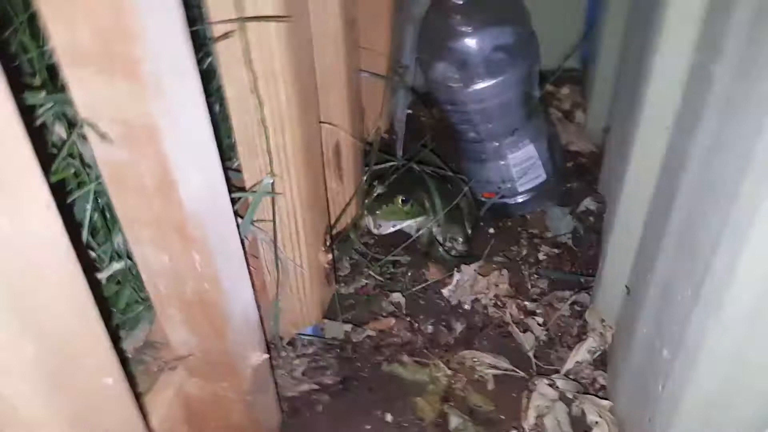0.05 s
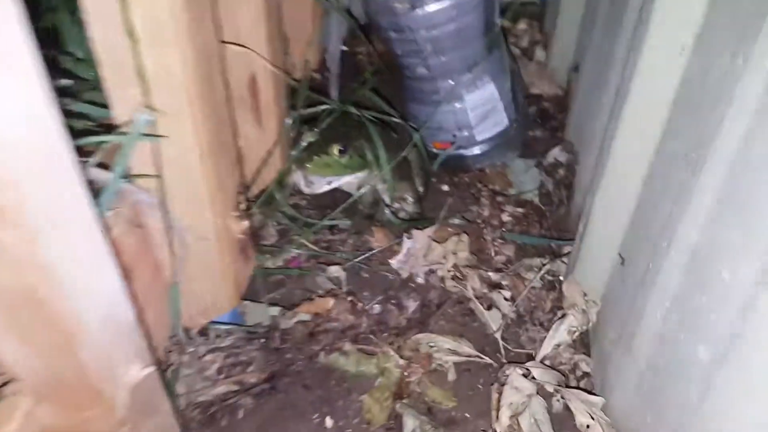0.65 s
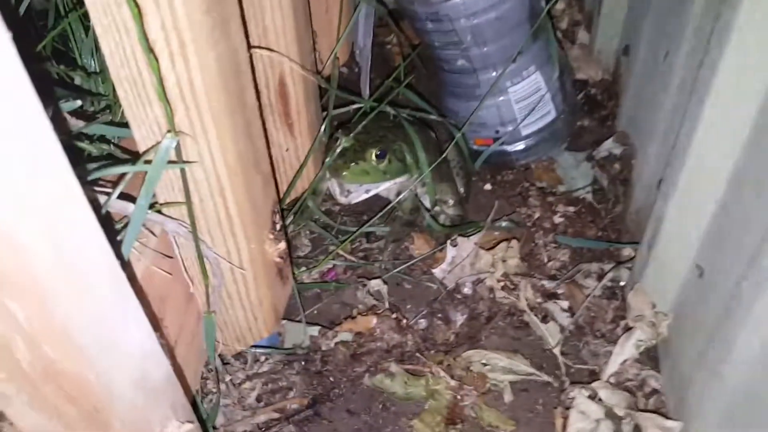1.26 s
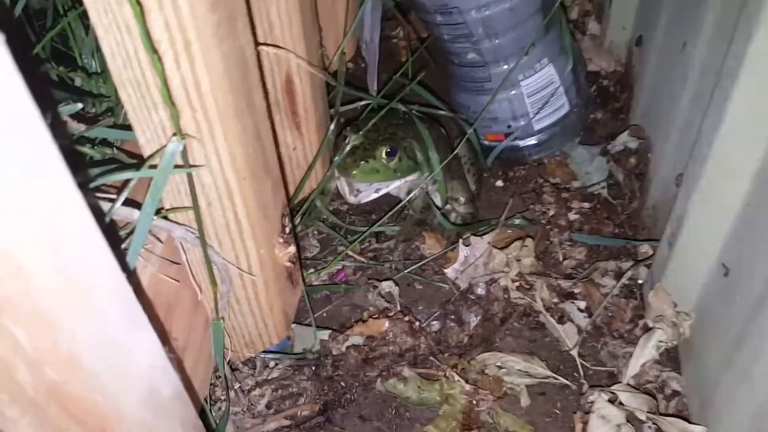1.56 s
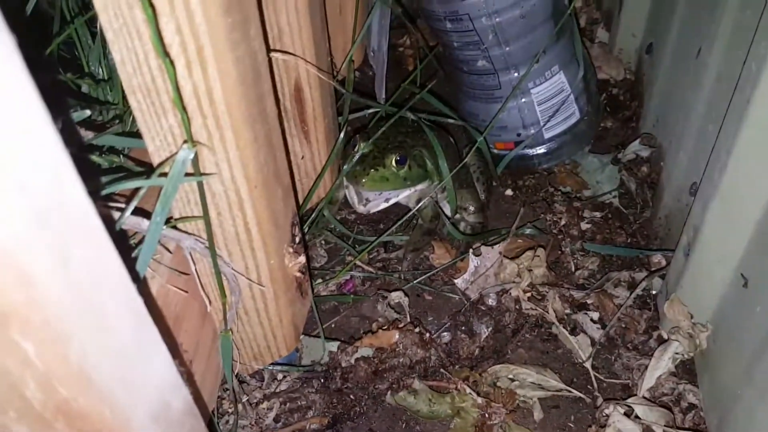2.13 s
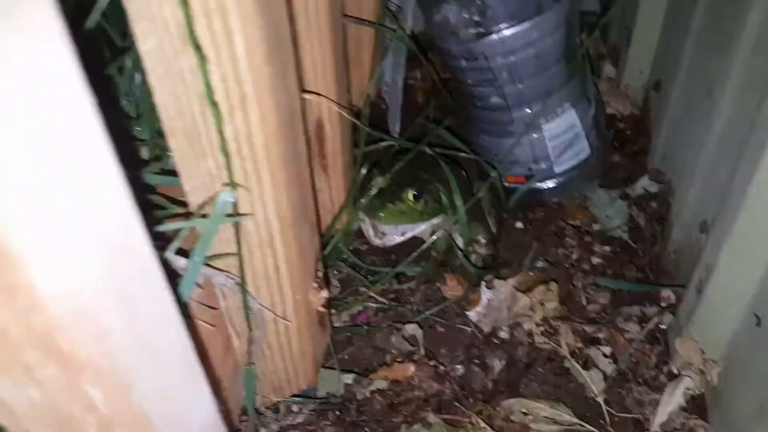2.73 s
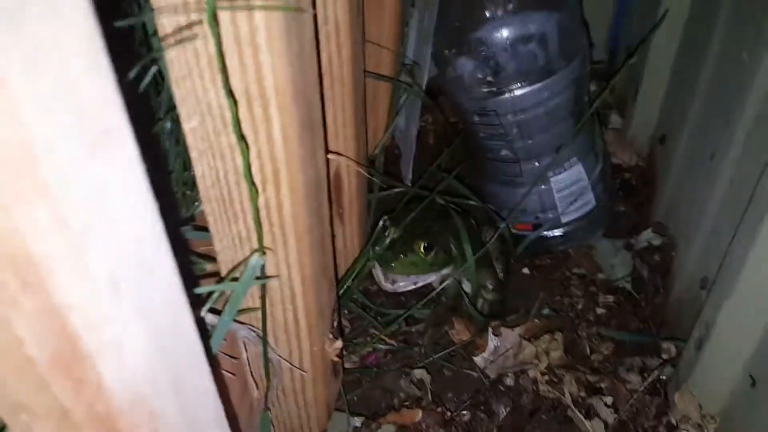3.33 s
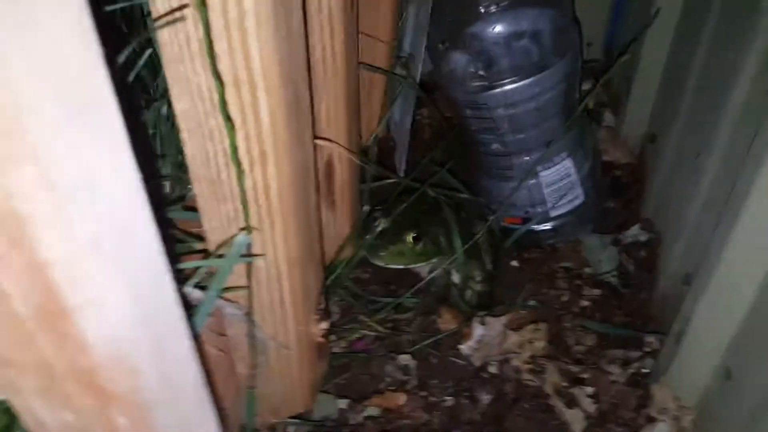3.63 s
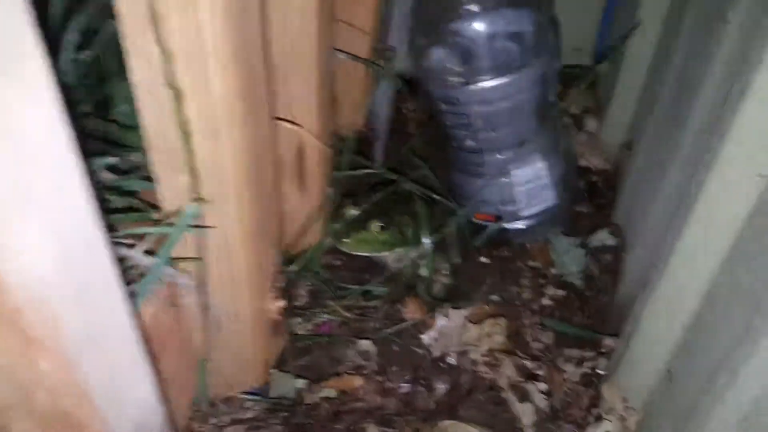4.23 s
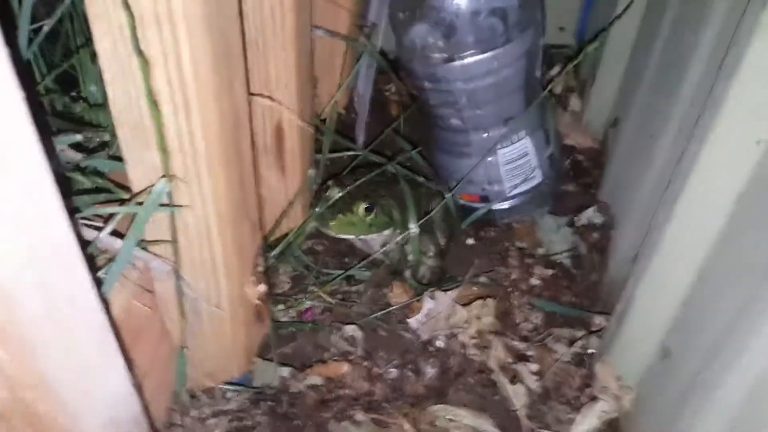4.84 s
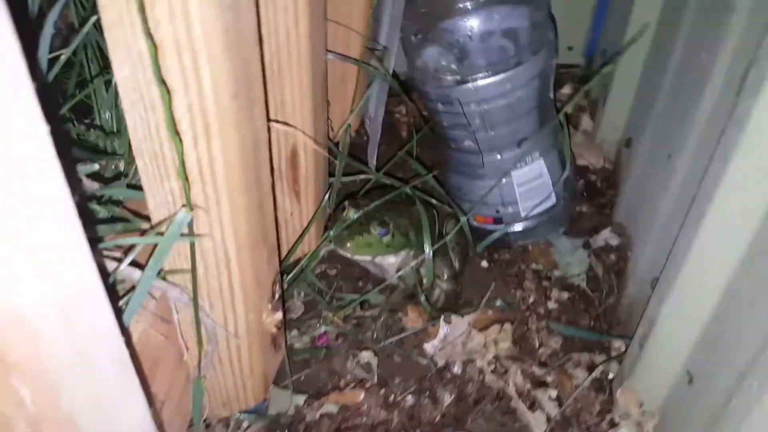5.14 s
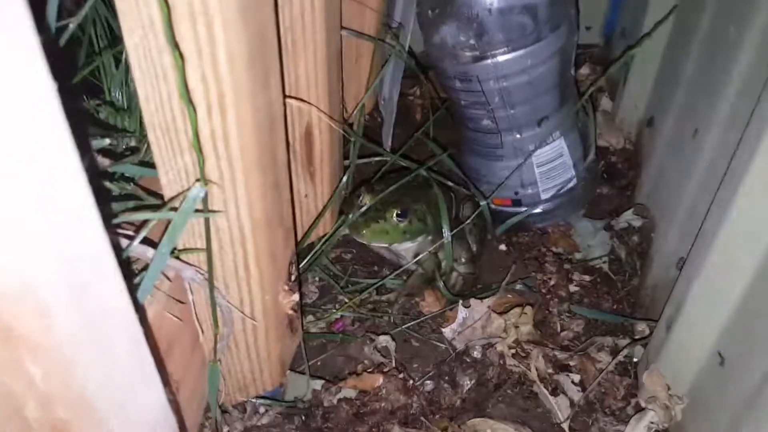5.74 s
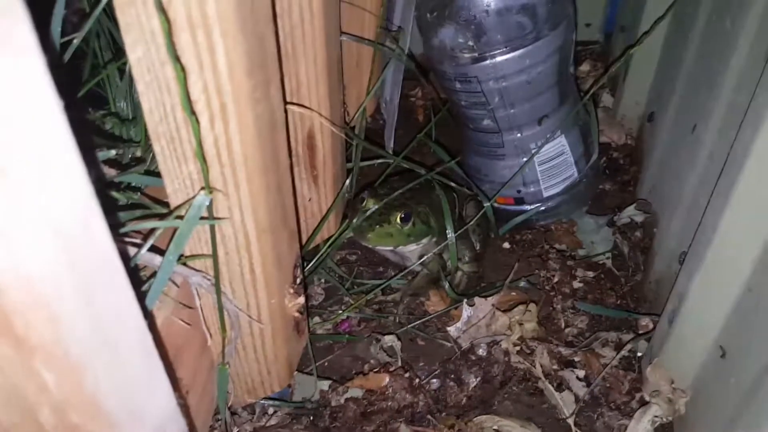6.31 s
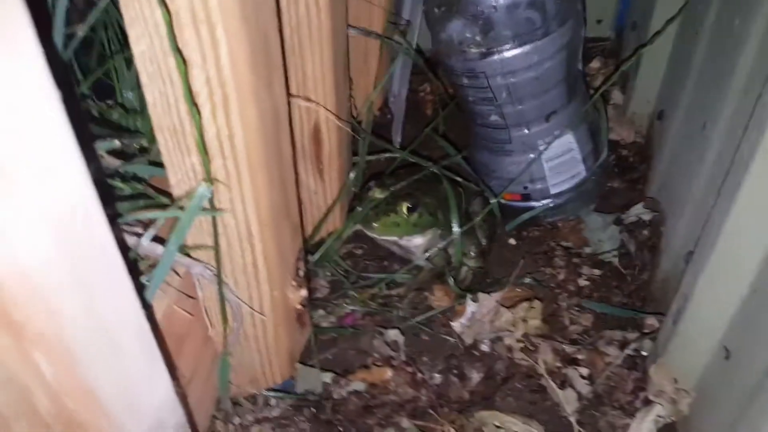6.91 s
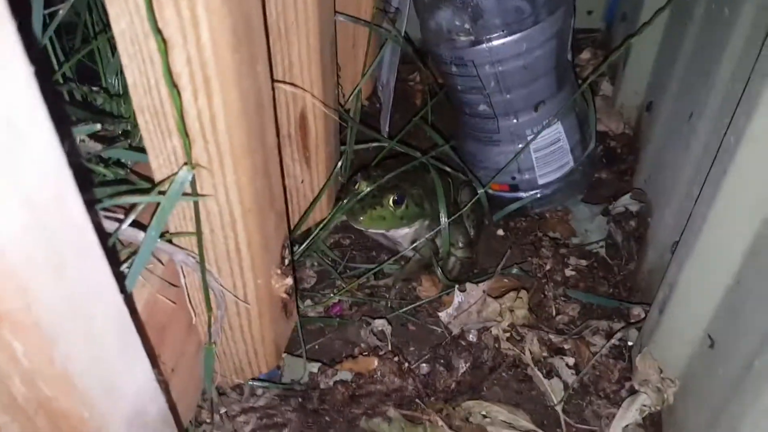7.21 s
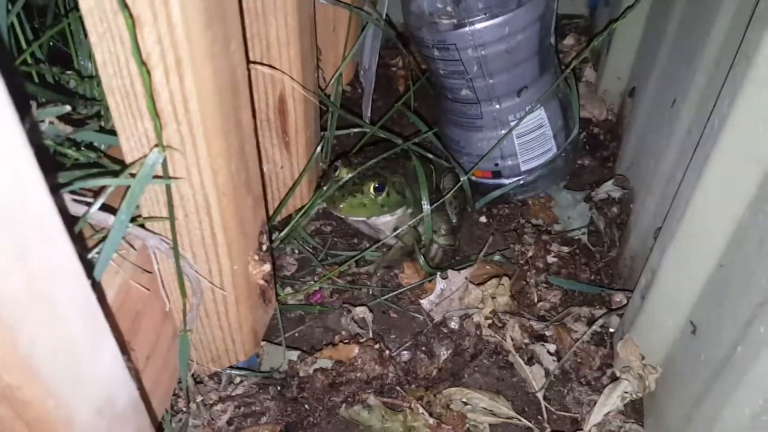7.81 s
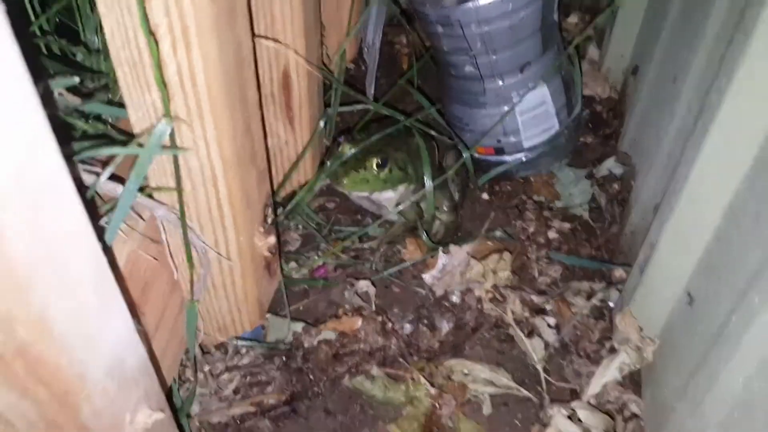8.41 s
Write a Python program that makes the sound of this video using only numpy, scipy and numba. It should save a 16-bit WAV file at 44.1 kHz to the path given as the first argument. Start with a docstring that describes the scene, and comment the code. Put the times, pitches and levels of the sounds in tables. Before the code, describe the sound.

Close by in a narrow gap in a yard, a frog lets out one long, shrill scream. It drops in pitch by steps, breaks between a clean tone and a rasp, and ends in a brief rising squeak. Afterwards dry leaves rustle faintly and twigs give tiny snaps. A machine hums low and steady throughout over soft outdoor hiss, and fingers now and then bump the hand-held microphone.

```python
"""One long frog scream sinks in pitch by steps, breaks between clean and rasping, and ends in a squeak.
The frog is cornered between a wooden fence and a metal wall. Membranes in its throat chop its
breath into pulses, which ring in its body and open mouth and echo in the narrow gap.
A machine hums in the yard and fingers bump the hand-held microphone.
The hand rubs softly on the microphone during the cry; then dry leaves rustle in swells."""
import sys
import numpy as np
from scipy import signal
from scipy.fft import rfft, irfft
from scipy.io import wavfile
from scipy.ndimage import uniform_filter1d
from numba import njit

SR = 44100
rng = np.random.default_rng(int(sys.argv[2]) if len(sys.argv) > 2 else 0)


def dump_mix(stems):
    """Bounce the given channels to the path in sys.argv[1] as a 16-bit WAV at rate SR."""
    frames = np.atleast_2d(stems).T  # one column per channel
    limited = np.clip(frames, -1, 1)  # hard clip at full scale
    pcm = np.round(limited * 32767).astype(np.int16)
    wavfile.write(sys.argv[1], SR, pcm)


N = 377496
TIME = np.arange(N) / SR
BINS = np.maximum(np.fft.rfftfreq(N, 1 / SR), 1)   # the frequencies of a spectrum, in Hz
CRY_END_S, CRY_SAMPLES = 3.6, 4 * SR
BREAK_S = 0.0014   # time the voice takes to break

# fits of rasping that break into the clean voice:
# (start [s], end [s], roughness [0-1], pitch swing [share], second membrane's buzz [0-1], rattle [0-1])
RASP_FITS = [(0.678, 1.011, 0.56, 0.0064, 0.3, 0.16), (1.07, 1.345, 0.25, .0005, 0.77, 0.05),
             (1.352, 1.384, 0.83, 0.0096, 0.7, 0.16), (1.439, 1.51, 0.2, 0.0028, 0.5, 0.09),
             (1.531, 1.687, 0.68, 0.012, 0.87, 0.1), (1.69, 1.83, 0.56, 0.0041, 0.74, 0),
             (1.833, 1.904, 0.27, 0.0125, 0.9, 0.24), (1.9, 2.157, 0.29, 0.0037, 0.6, 0.12),
             (2.271, 2.38, 0.41, 0.0033, 0.75, 0.17), (2.65, 2.854, 0.68, 0.00496, 0.4, 0.14),
             (2.857, 3.045, 0.8, .06, 0.53, 0.24), (3.045, 3.084, 0.4, 0.016, 0, 0),
             (3.177, 3.372, 0.3, .06, 0.8, 0.2), (3.474, 3.582, 0.6, 0.0218, 0.7, 0.4)]


def from_db(db):
    """Turn decibels into a factor to multiply by."""
    return 10 ** (np.asarray(db) / 20)


def rms_one(x):
    """Scale a signal to an average power of 1."""
    return x / np.sqrt(np.mean(x ** 2) + 1e-20)


def in_time(rows):
    """Join a table's rows with straight lines over time: one curve per value column."""
    times, *columns = np.transpose(rows)
    return [np.interp(TIME, times, column) for column in columns]


def at_bins(points, bins=BINS):
    """Read a table at every frequency, giving each octave equal room."""
    hz, value = np.transpose(points)
    return np.interp(np.log(bins), np.log(hz), value)


def during(start, end, fade_s):
    """1 between two times and 0 outside, with short fades."""
    return np.clip(np.minimum(TIME - start, end - TIME) / fade_s + .5, 0, 1)


def drift(rate_hz):
    """A smooth random wobble of typical size 1, mostly slower than the given rate."""
    return rms_one(irfft(rfft(rng.standard_normal(N)) / (1 + (BINS / rate_hz) ** 2), N))


def resonate(x, hz, width_hz):
    """A resonance: sound near one frequency passes, the rest is weakened."""
    r = np.exp(-np.pi * width_hz / SR)
    feedback = [1, -2 * r * np.cos(2 * np.pi * hz / SR), r * r]
    return signal.lfilter(np.array([1, 0, -1]) * (1 - r * r) / 2, feedback, x + 1e-18)


@njit
def gliding(x, hz, width_hz):
    """A resonance whose frequency follows a curve."""
    angle, r = 2 * np.pi * hz / SR, np.exp(-np.pi * width_hz / SR)
    y = np.zeros(len(x))
    for i in range(2, len(x)):
        push = (1 - r * r) / 2 * (x[i] - x[i - 2])
        y[i] = push + 2 * r * np.cos(angle[i]) * y[i - 1] - r * r * y[i - 2]
    return y


def ringing(source, resonances):
    """Ring several resonances at once and add them with alternating signs."""
    return sum((-1) ** k * from_db(db) * resonate(source, hz, width)
               for k, (hz, width, db) in enumerate(resonances))


def air_noise(spectrum):
    """Stereo noise with a given spectrum, nearly the same left and right in the bass."""
    # how alike the two sides are: (frequency [Hz], likeness [-1 to 1])
    likeness = [(60, 0.94), (150, 0.99), (380, 0.76), (950, 0.23), (2380, -0.13), (5980, 0.053),
                (15000, -0.12)]
    mid, side = rfft(rng.standard_normal((2, N)))
    alike = np.clip(at_bins(likeness), -.99, .99)
    pair = np.sqrt(1 + alike) * mid + np.sqrt(1 - alike) * side * [[1], [-1]]
    return rms_one(irfft(pair * from_db(at_bins(spectrum)), N))


def yard(hiss_db=-41.5, rumble_db=-46.5):
    """Steady outdoor hiss over a low rumble."""
    # the tone of each: (frequency [Hz], relative level [dB])
    hiss = [(100, -47), (170, -4.5), (290, -11), (380, -5.5), (600, -11), (780, -7.5), (1150, -13),
            (2600, -15.5), (4300, -26.5), (7500, -25.5), (10000, -34), (15800, -40)]
    rumble = [(20, -25), (38, -20), (55, -7.5), (90, -2.5), (170, -2), (260, -6), (500, -49)]
    return from_db(hiss_db) * air_noise(hiss) + from_db(rumble_db) * air_noise(rumble)


def machine_hum(hum_hz=120.0, level_db=-25.5, waver_db=0.35):
    """A machine hums at twice the mains rate; its level wavers and dips now and then."""
    # the tones in the hum: (multiple of the pitch, relative level [dB])
    harmonics = [(1, 3), (2, -19.5), (3, -47)]
    # quieter stretches: (start [s], end [s], depth [dB])
    dips = [(4.495, 4.76, 2.5), (5.086, 5.332, 5), (6.285, 6.936, 1.4)]
    angle = 2 * np.pi * hum_hz * TIME + 0.046 * drift(12)
    tone = sum(from_db(db) * np.sin(k * angle) for k, db in harmonics)
    dip_db = sum(db * during(start, end, fade_s=0.073) for start, end, db in dips)
    return from_db(level_db - dip_db + waver_db * drift(3)) * rms_one(tone)


def rubbing_and_leaves(stir_db=-55, rise_octaves=0.38):
    """Low rubbing of the hand on the microphone during the cry, then dry leaves rustling in swells."""
    # the tone of the grainy hiss: (frequency [Hz], relative level [dB])
    spectrum = [(200, -55), (450, 12.5), (900, -1.5), (2200, 7), (3300, -2), (4800, -7), (8000, -12),
                (15000, -56)]
    # swells that rise in pitch; the first two are the hand, the rest are leaves:
    # (middle [s], half length [s], relative level [dB], centre pitch [Hz])
    rustles = [(1.72, 0.13, -48, 500), (2.228, 0.46, -52, 900), (3.584, 0.2, -43.5, 600),
               (4.284, 0.16, -51.5, 1980), (4.713, 0.066, -46.5, 2000), (4.927, 0.06, -45, 1670),
               (5.12, 0.11, -41.5, 3050), (5.546, 0.13, -49, 1260), (5.76, .05, -44, 990),
               (6.398, 0.086, -43, 2300), (6.79, 0.054, -41.5, 2200)]
    swells = np.array([from_db(db) * np.exp(-((TIME - s) / half_s) ** 2) + 1e-12
                       for s, half_s, db, _ in rustles])
    centres = [hz * 2 ** (rise_octaves * np.tanh((TIME - s) / half_s)) for s, half_s, _, hz in rustles]
    centre_hz = np.average(centres, axis=0, weights=swells)
    stir = from_db(stir_db + 3 * drift(12))
    grains = from_db(2.5 * drift(39) + 2.5 * drift(8.1)) * air_noise(spectrum)
    focused = np.array([gliding(side, centre_hz, width_hz=900) for side in grains])
    return stir * grains + swells.sum(axis=0) * (from_db(-5) * grains + from_db(4) * focused)


def twig_snaps(decay_s=0.0018, width_hz=700, boost_db=3):
    """Twigs and leaves snap: each is a tiny burst of noise ringing around one pitch."""
    # (time [s], relative level [dB], pitch [Hz])
    snaps = [(4.284, -34, 1980), (4.342, -36, 3400), (4.483, -33, 2160), (4.6228, -32, 1800),
             (4.674, -30, 1800), (5.9956, -30.5, 2150), (6.272, -36, 2960), (6.4742, -30, 2270),
             (7.1846, -28, 1380), (7.8658, -33, 2880)]
    sound, age = np.zeros((2, N)), TIME[:SR // 50]
    for s, db, hz in snaps:
        burst = np.exp(-age / decay_s) * rng.standard_normal((2, len(age)))
        crack = resonate(resonate(burst, hz, width_hz), hz, 2 * width_hz)
        at = int(s * SR)
        sound[:, at:at + len(age)] += from_db(db + boost_db) * crack / np.abs(crack).max()
    return sound


def finger_bumps(ring_s=0.0055, contact_s=0.00039, casing_hz=1600, casing_db=-20):
    """A soft finger knocks the microphone's casing, which rings briefly as the finger scuffs along."""
    # (time [s], knock level [dB], pitch [Hz], left over right [dB], scuff level [dB], scuff length [s])
    bumps = [(0.1, -23, 430, 0, -31.5, 0.031), (0.342, -26, 467, -2, -33.5, 0.021),
             (1.701, -25, 436, -27, -34.5, .04), (1.86, -23.5, 436, 0, -32, 0.0093),
             (2.092, -17, 764, 7, -26.5, 0.021), (2.302, -25, 805, 11, -35, 0.025),
             (2.383, -23, 810, 12, -31, 0.017), (3.148, -29, 470, 0, -45, 0.027),
             (3.487, -27, 457, 0, -32, 0.014), (3.522, -20, 438, 0, -44, 0.022),
             (3.684, -21, 440, -1, -52, .02), (4.343, -14, 423, -15, -38, 0.042),
             (4.485, -29, 277, 22, -40, 0.016), (5.075, -27, 513, -20, -56, 0.05),
             (5.463, -27.5, 377, -13, -46, 0.058), (5.923, -19.5, 480, -35, -23.5, .017),
             (6.118, -33, 830, 0, -55, .01), (6.214, -18.5, 412, -12, -29, 0.018),
             (6.237, -21, 360, -12, -40, 0.029), (6.273, -22, 407, -24, -28, 0.0029),
             (7.481, -33.5, 760, 0, -52, 0.0072), (7.667, -10.5, 487, -22, -58, .01)]
    # the tone of a sliding finger: (frequency [Hz], relative level [dB])
    scuff = [(150, -26), (400, 10.5), (900, 0.5), (1600, 2), (3200, -4.5), (4800, -22), (15000, -40)]
    knocks, sliding, age = np.zeros((2, N)), np.zeros(N), TIME[:SR // 8]
    push = (1 - np.exp(-(age / contact_s) ** 2)) * np.exp(-age / ring_s)
    for s, db, hz, pan_db, scuff_db, scuff_s in bumps:
        span = slice(int(s * SR), int(s * SR) + len(age))
        ring = np.sin(2 * np.pi * hz * age) + from_db(casing_db) * np.sin(2 * np.pi * casing_hz * age)
        knocks[:, span] += panned(pan_db) * from_db(db) * push / push.max() * ring
        sliding[span] += from_db(scuff_db) * np.exp(-(age / scuff_s) ** 4)
    return knocks + sliding * from_db(3 * drift(420)) * air_noise(scuff)


def panned(left_right_db):
    """Left and right volume factors that average 1."""
    ratio = from_db(np.atleast_1d(left_right_db))
    return 2 * np.array([ratio, np.ones_like(ratio)]) / (1 + ratio)


def evened(pair):
    """Hold a stereo sound at a steady level of 1."""
    power = uniform_filter1d(pair.mean(axis=0) ** 2, size=1100)
    return pair / np.sqrt(np.abs(power) + 1e-12)


def narrow_gap(echo_s=0.17):
    """Paths from frog to microphone between fence and wall: one direct, and two sets of echoes."""
    # how the frog reaches the two sides: (frequency [Hz], left over right [dB])
    balance = [(600, 0), (1000, 5.5), (1500, 6), (2000, -5.5), (4200, 1.5), (5000, 8.5), (6000, 6.5),
               (6900, 30), (8300, 10), (9800, 26), (11300, 21), (13200, 10), (15500, 22)]
    # (frequency [Hz], how far the left wave is ahead [radians])
    lead = [(400, -1.3), (900, 0.6), (1700, 2), (2600, 2.5), (3100, 2), (3470, 2), (3800, 3.5),
            (4200, 2.23), (4800, -4), (6000, 2.5), (7000, -3.5), (9000, -4.5)]
    age, bins = TIME[:SR // 4], np.maximum(np.fft.rfftfreq(CRY_SAMPLES, 1 / SR), 1)
    scatter = rng.standard_normal((2, 2, len(age))) * from_db(-60 * age / echo_s) * (age > .001)
    scatter /= np.sqrt(np.sum(scatter ** 2, axis=-1, keepdims=True))
    echo_db = at_bins([(2000, -14), (9000, -8)], bins)   # the treble echoes more
    echoes = rfft(scatter, CRY_SAMPLES) * from_db(echo_db)
    direct = np.exp(.5j * at_bins(lead, bins) * [[1], [-1]])
    return np.array([direct, *echoes]) * panned(at_bins(balance, bins))


def through_gap(voice, band_hz, paths, sway):
    """Send one band of the voice through the gap; the echoes shift as the hand sways."""
    band = signal.butter(2, band_hz, "band", fs=SR, output="sos")
    filtered = signal.sosfilt(band, signal.sosfilt(band, voice[:CRY_SAMPLES]))
    direct, echo_a, echo_b = irfft(rfft(filtered) * paths)
    pair = direct + np.cos(sway) * echo_a + np.sin(sway) * echo_b
    return np.pad(pair, [(0, 0), (0, N - CRY_SAMPLES)])


def stutter(rate_hz=30):
    """Pitch factor: in a rasp the voice catches and flips between tight and slack, at an uneven pace."""
    swing = sum(share * during(start, end, BREAK_S) for start, end, _, share, _, _ in RASP_FITS)
    return 1 + swing * np.tanh(1.45 * drift(rate_hz))


def rasping(pitch, clean_roughness=0.21, clean_buzz=0.9):
    """Roughness of the membranes and buzz of the second one, both 0-1: nearly clean between fits."""
    rough, buzz = clean_roughness * pitch / pitch[0], clean_buzz   # smoother as they slacken
    for start, end, fit_rough, _, fit_buzz, _ in RASP_FITS:
        inside = during(start, end, BREAK_S)
        rough = rough + (fit_rough - rough) * inside
        buzz = buzz + (fit_buzz - buzz) * inside
    return np.clip(rough * np.exp(0.18 * drift(32)), 0, 1), np.clip(buzz, 0, 1)


def rattle(rate_hz=150, spread_hz=190):
    """Strength factor: in a rasp the slack membranes flap unevenly, far below the pitch."""
    depth = sum(share * during(start, end, BREAK_S) for start, end, *_, share in RASP_FITS)
    flapping = resonate(resonate(rng.standard_normal(N), rate_hz, spread_hz), rate_hz, spread_hz)
    return 1 + depth * rms_one(flapping)


def membranes(pitch, rough, buzz, second_ratio=.435, hiss_db=-27):
    """One sharp pulse per cycle; a second, slower membrane tugs at their timing and strength."""
    cycles = np.cumsum(pitch * (1 + .013 * rough * drift(87) + 0.001584 * drift(26))) / SR
    second_hz = second_ratio * pitch * (1 + .015 * drift(58))
    second = buzz * np.sin(2 * np.pi * np.cumsum(second_hz) / SR)
    pull = 0.054 * np.array([[1], [.65]])   # two rows: full pulses, and their steadier closing edges
    cycles = cycles + rough * (pull * second + .007 * drift(430))
    half_angle = np.pi * (cycles % 1 - .5) + 1e-9
    harmonics = np.floor(SR * .45 / pitch)
    # a shortcut for adding up that many equally strong harmonics
    pulses = (np.sin((2 * harmonics + 1) * half_angle) / np.sin(half_angle) - 1) / np.sqrt(2 * harmonics)
    strength = 1 + rough * (0.13 * second + .18 * drift(230))
    opening = 2 * np.cos(half_angle) ** 2
    escaping_air = from_db(hiss_db) * rough * rng.standard_normal(N) * opening
    return pulses * strength + escaping_air


def double_slap(edges, strength=0.45, gap_s=0.0005656):
    """The membranes slap twice a cycle; the delay wanders slowly, so different overtones stand out."""
    delay_s = gap_s * (1 + 0.17 * drift(1.03))
    return edges + strength * np.interp(TIME - delay_s, TIME, edges)


def frog_body(pulses, pitch, gap, level_db=-32.5, reach_hz=120, fade_s=.2):
    """The body rings, loudest when the pitch is near its lowest resonance."""
    # (frequency [Hz], width [Hz], relative level [dB])
    resonances = [(658, 85, -4), (1555, 99, -4)]
    body_db = level_db - 10 * np.log10(1 + ((pitch - resonances[0][0]) / reach_hz) ** 4)
    sound = through_gap(ringing(pulses, resonances), (513, 1540), *gap)
    return from_db(body_db) * evened(sound) * np.clip((CRY_END_S - TIME) / fade_s, 0, 1)


def open_mouth(pulses, gap, trim_db=0.98):
    """The mouth rings with the pulses and beams them at the shifting microphone."""
    # (frequency [Hz], width [Hz], relative level [dB])
    resonances = [(1814, 230, -4.5), (2515, 470, 0), (2750, 265, 3), (3690, 455, -3.5), (4070, 78, 8),
                  (4092, 146, 2.5)]
    # the jaw's opening favours one moving band: (time [s], frequency [Hz], boost [dB])
    gape = [(0, 3350, 32), (.36, 3400, 12), (.5, 3530, 21), (.76, 3490, 22), (1.0, 3300, 22),
            (1.02, 4580, 18), (1.42, 4500, 8.5), (1.45, 3950, 23), (1.52, 4000, 17), (1.56, 2520, 5),
            (1.63, 3020, 3), (1.74, 3350, 8.5), (1.8, 2900, -0.5), (1.89, 2940, 8), (1.93, 3120, 1),
            (2.13, 3100, 4), (2.16, 1910, 4), (2.36, 1888, -1), (2.389, 4040, 12), (2.63, 3920, 11),
            (2.66, 3700, 9), (2.86, 3700, 14.5), (3.05, 3670, 6), (3.17, 3550, 15), (3.25, 3220, 7),
            (3.4, 2500, 10), (3.57, 2650, 36)]
    # (time [s], relative level [dB])
    loudness = [(0.0, -27), (0.17, -28.5), (0.27, -32), (0.4, -30.5), (0.49, -31.5), (0.51, -28),
                (0.65, -26.5), (0.69, -31), (0.93, -30.5), (1.07, -32), (1.16, -29), (1.32, -30),
                (1.5, -27), (1.69, -24.5), (1.84, -26), (1.92, -31.5), (2.12, -31), (2.16, -36),
                (2.35, -34), (2.39, -29.5), (2.64, -31), (2.66, -29.5), (2.82, -28), (3.07, -29.5),
                (3.11, -32.5), (3.25, -30.5), (3.39, -33.5), (3.47, -36), (3.55, -39.5), (3.6, -43)]
    # the microphone moves in the beam: (time [s], left over right [dB], stereo width [dB])
    aim = [(.4, 2.5, -7.5), (.7, 3.5, -4.5), (1.3, 3, -0.5), (1.7, 2, -4.5), (2.25, 2.5, -6),
           (2.7, 7.5, -9), (3.2, 6.5, -4.5), (3.45, 5, -10)]
    gape_hz, boost_db = in_time(gape)
    mouth_db, = in_time(loudness)
    left_right_db, width_db = in_time(aim)
    focused = pulses + (from_db(boost_db) - 1) * gliding(pulses, gape_hz, width_hz=320)
    pair = through_gap(ringing(focused, resonances), (1650, 4500), *gap)
    mid = pair.mean(axis=0)
    aimed = (mid + from_db(width_db) * (pair - mid)) * panned(left_right_db)
    return from_db(mouth_db + trim_db) * evened(aimed)


def shrill_throat(edges, gap, flutter_db=1.02):
    """The tense throat makes one narrow resonance shrill; it catches and lets go abruptly."""
    # (time [s], frequency [Hz], level [dB])
    shrillness = [(0, 7500, -37), (.08, 7050, -33.5), (.2, 6740, -34), (.36, 7600, -26.5),
                  (.44, 7100, -27.5), (.485, 7300, -35), (.51, 6740, -22), (.68, 6950, -28.5),
                  (.9, 7000, -26), (1.01, 6900, -29.5), (1.08, 7300, -32.5), (1.14, 6980, -22.5),
                  (1.42, 6930, -28), (1.46, 6700, -32), (1.6, 7200, -37.5), (1.75, 6900, -37),
                  (2.07, 6960, -37), (2.16, 7000, -54), (2.23, 6900, -60), (2.28, 7150, -45.5),
                  (2.45, 6950, -40), (2.6, 6900, -31), (2.75, 6900, -39), (2.87, 7050, -42),
                  (3.12, 6800, -46), (3.4, 6850, -48), (3.5, 6900, -47), (3.56, 6900, -53.5)]
    hz, db = in_time(shrillness)
    sound = through_gap(gliding(edges, hz, width_hz=350), (6750, 7620), *gap)
    return from_db(db + flutter_db * drift(22)) * evened(sound)


def high_overtones(slaps, gap, flutter_db=1.02):
    """Two bands of overtones fade as the air runs out and flare in the last squeak."""
    # resonances of each band: (frequency [Hz], width [Hz], relative level [dB])
    treble_resonances = [(4870, 490, 2), (6550, 1000, -5.5), (7980, 400, 0.5), (8600, 1120, -2),
                         (9800, 980, -5)]
    top_resonances = [(10570, 760, -1), (11370, 420, 1.5), (12200, 450, 0.5), (13700, 1400, -4),
                      (14740, 700, -2.5)]
    # (time [s], treble level [dB], top level [dB])
    levels = [(0, -31, -38.5), (.3, -32, -38), (.52, -31, -37.5), (1.0, -29.5, -38.5), (1.5, -31.5, -39.5),
              (1.58, -31.5, -40.5), (1.88, -36.5, -42), (1.93, -37.5, -45), (2.15, -35.5, -44),
              (2.6, -41.5, -46.5), (3.05, -42, -50.5), (3.1, -48, -51.5), (3.3, -46.5, -54),
              (3.38, -45, -45.5), (3.47, -47, -51), (3.56, -55.5, -65)]
    treble_db, top_db = in_time(levels)
    treble = evened(through_gap(ringing(slaps, treble_resonances), (5100, 9700), *gap))
    top = evened(through_gap(ringing(slaps, top_resonances), (8400, 19000), *gap))
    return (from_db(treble_db + flutter_db * drift(8.7)) * treble
            + from_db(top_db + flutter_db * drift(8.8)) * top)


def frog(start_s=0.00018, stop_s=0.016):
    """The scream: the same membranes drive body, mouth, throat and high overtones."""
    # the cry sinks as the air runs out, snaps down twice and flips up to squeak: (time [s], pitch [Hz])
    melody = [(0, 1098), (.15, 1070), (.29, 1041), (.47, 1028), (.53, 1004), (.66, 1001), (.68, 982),
              (.87, 971.2), (1.005, 952.5), (1.015, 897), (1.14, 873.7), (1.37, 861), (1.525, 835.6),
              (1.535, 766.5), (1.84, 742.4), (1.9, 680.2), (1.994, 644.2), (2.016, 667.2), (2.236, 621.5),
              (2.306, 625.6), (2.54, 598.4), (2.85, 573.8), (2.87, 610), (3.05, 614.3), (3.09, 579),
              (3.17, 569), (3.23, 622.3), (3.3, 649), (3.36, 711.4), (3.385, 857), (3.46, 802),
              (3.58, 762.5)]
    pitch, = in_time(melody)
    pulses, edges = membranes(pitch * stutter(), *rasping(pitch)) * rattle()
    slaps = double_slap(edges)
    gap = narrow_gap(), 2 * drift(3.1)[:CRY_SAMPLES]   # the sound's paths and the hand's sway
    cry = frog_body(pulses, pitch, gap) + open_mouth(pulses, gap)
    cry += shrill_throat(edges, gap) + high_overtones(slaps, gap)
    return cry * np.minimum(TIME / start_s, 1) * np.clip((CRY_END_S - TIME) / stop_s, 0, 1)


def scene():
    """Everything heard from the opening of the gap."""
    return frog() + machine_hum() + yard() + rubbing_and_leaves() + twig_snaps() + finger_bumps()


def record(dry, threshold_db=-17, release_db_per_s=450, attack_s=0.0054, split_hz=900, cutoff_hz=15900):
    """A limiter turns the bass down briefly after hard bumps; the highest treble is cut."""
    bass = signal.sosfiltfilt(signal.butter(2, split_hz, fs=SR, output="sos"), dry)
    over_db = np.maximum(20 * np.log10(np.abs(bass).max(axis=0) + 1e-9) - threshold_db, 0)
    held_db = np.maximum.accumulate(over_db + release_db_per_s * TIME) - release_db_per_s * TIME
    smoothing = np.exp(-1 / (attack_s * SR))
    duck_db = signal.lfilter([1 - smoothing], [1, -smoothing], held_db)
    limited = dry + bass * (from_db(-duck_db) - 1)
    return irfft(rfft(limited) / (1 + (BINS / cutoff_hz) ** 200), N)


dry = scene()
out = record(dry)
dump_mix(out)
```